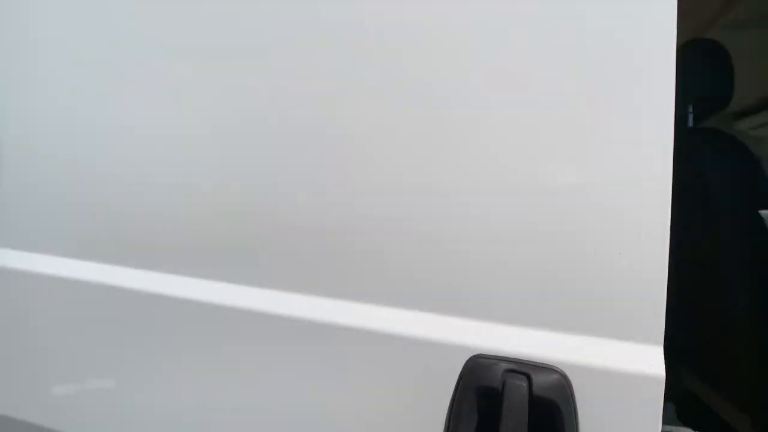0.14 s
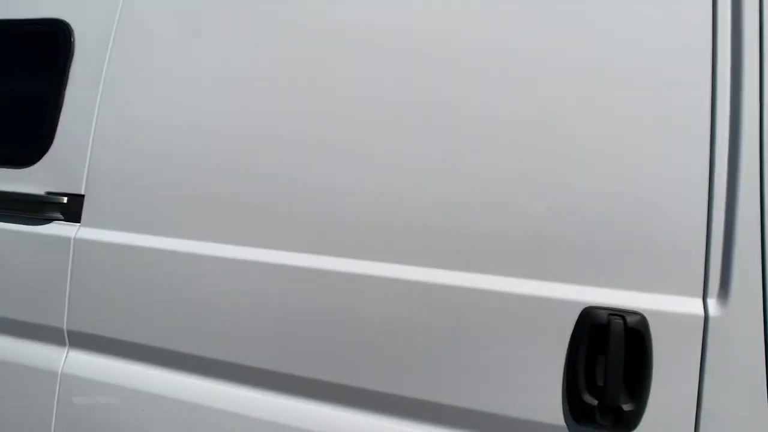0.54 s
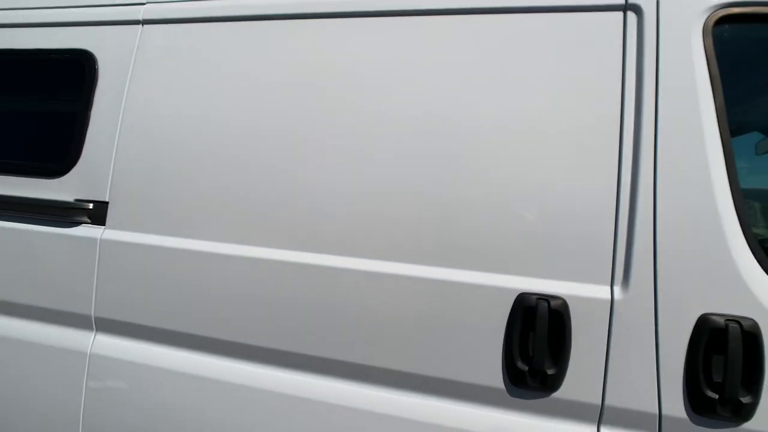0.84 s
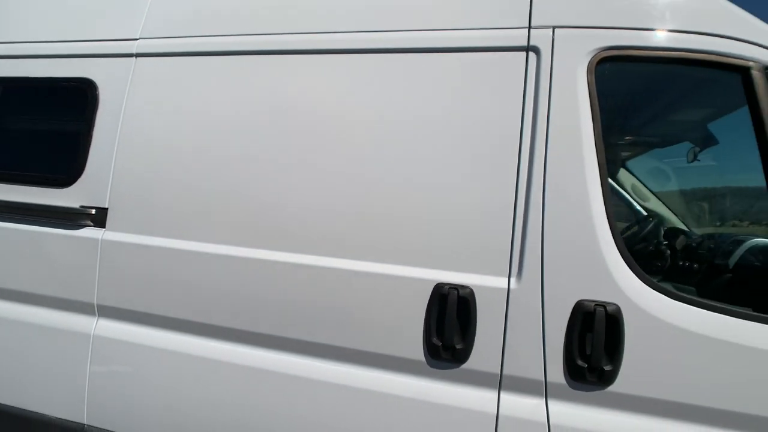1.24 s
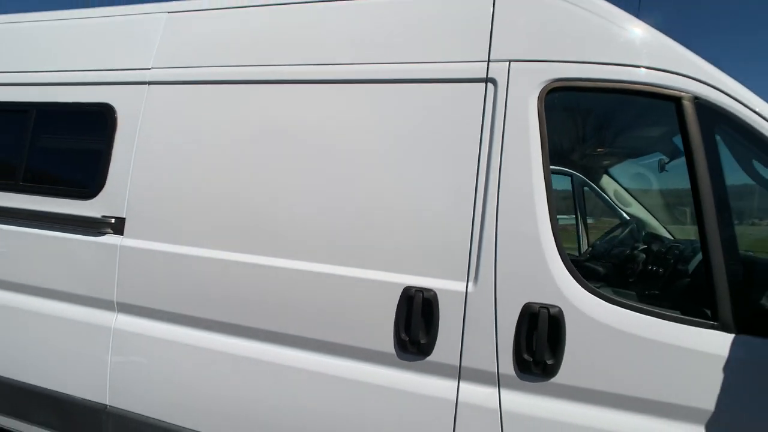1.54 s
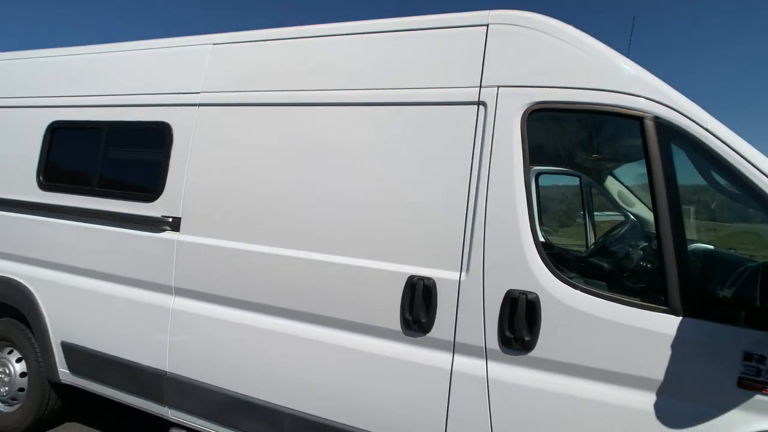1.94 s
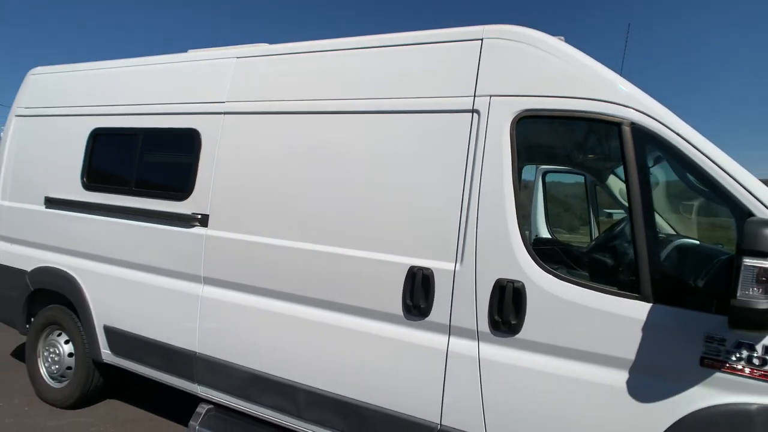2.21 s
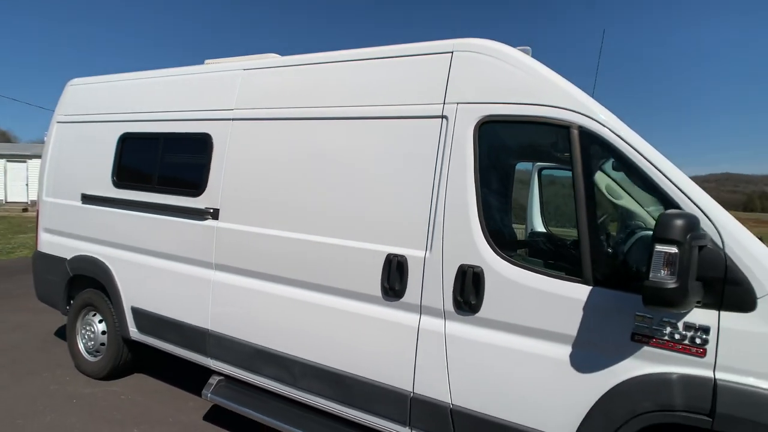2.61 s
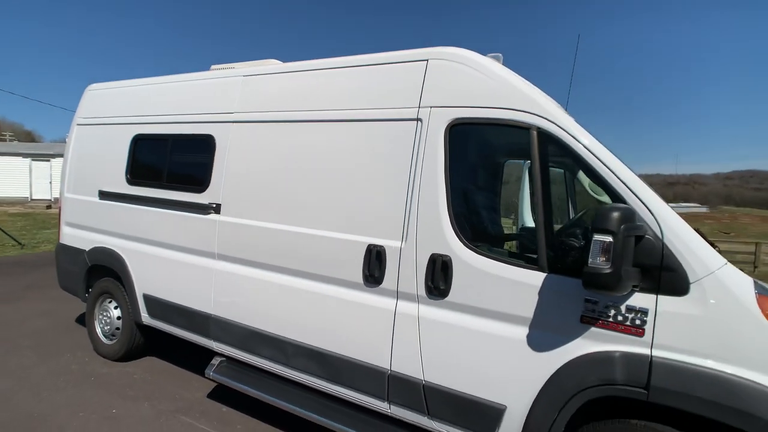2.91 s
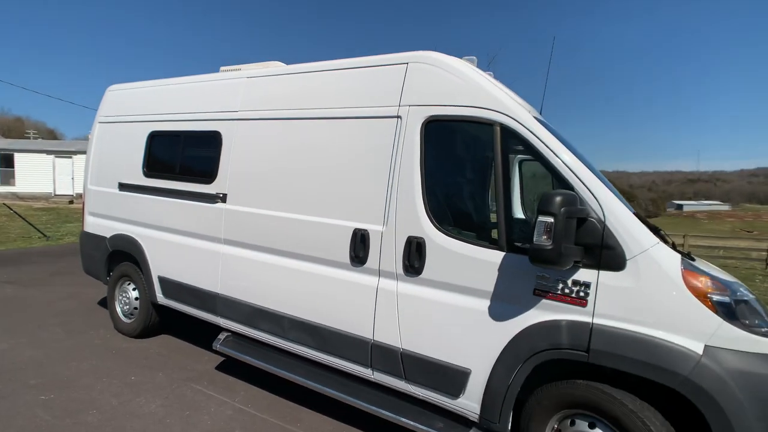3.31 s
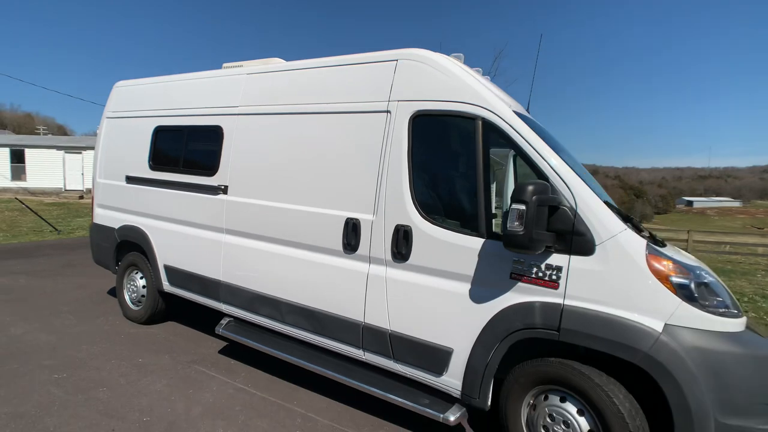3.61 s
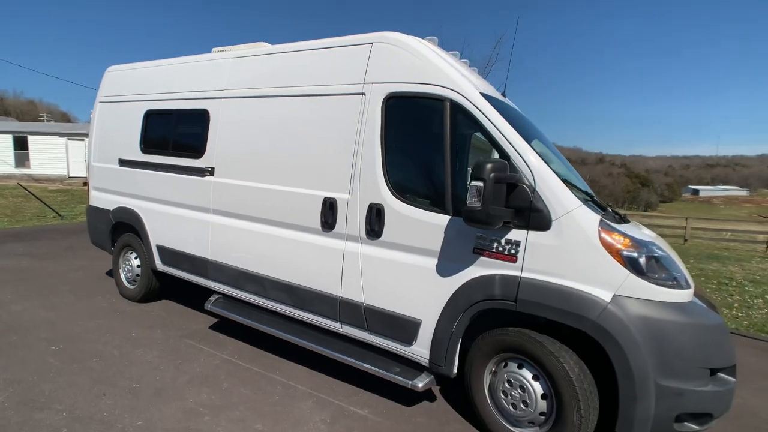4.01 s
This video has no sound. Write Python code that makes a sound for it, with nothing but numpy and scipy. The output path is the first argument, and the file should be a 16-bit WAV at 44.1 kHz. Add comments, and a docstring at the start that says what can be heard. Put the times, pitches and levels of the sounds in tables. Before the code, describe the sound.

A heavy van side door rolls briefly along its track and slams hard into its latch, then quiet outdoor hum with faint scuffs.

```python
"""A van's heavy side door rolls along its track, knocks into the closing curve and slams into its latch.
Rolling is noise driving the door's resonances; each blow is a noise burst with decaying panel modes.
Damped sines make the knocks and the bracket's ping, and one low swing makes the boom of the cabin air.
Then someone moves off over asphalt with faint scuffs and rustles, made of band-filtered noise,
in a low outdoor hum of shaped noise with slow gusts of wind on the microphone."""
import sys
import numpy as np
from scipy import signal
from scipy.fft import rfft, irfft
from scipy.io import wavfile
from scipy.ndimage import uniform_filter1d

SR = 44100
rng = np.random.default_rng(int(sys.argv[2]) if len(sys.argv) > 2 else 0)


def put_to_file(sound):
    """Save the sound as 16-bit audio at rate SR, in the file named by the first command-line argument."""
    columns = np.atleast_2d(sound).T  # one column per channel
    safe = np.clip(columns, -1, 1)
    whole_steps = np.round(safe * 32767)
    wavfile.write(sys.argv[1], SR, whole_steps.astype(np.int16))


N = 183059
TIME = np.arange(N) / SR

# spectrum of gritty and cloth friction: f/Hz, relative level/dB
FRICTION_COLOUR = [(400, -23), (1000, 16.5), (2000, 17), (4000, 10.5), (7000, 0), (10000, 1), (13000, -3),
                   (16000, -18)]


def amp(db):
    """Logarithmic level: converts decibels to an amplitude gain."""
    return 10 ** (np.asarray(db) / 20)


def evened(x):
    """Normalisation: scales a signal to rms 1."""
    return x / np.sqrt(np.mean(x ** 2) + 1e-20)


def steadied(x, size=400):
    """Running power normalisation: evens out a noise over a window of size samples."""
    power = uniform_filter1d(x ** 2, size)
    return x / np.sqrt(abs(power) + 1e-3)


def read(points, hz):
    """Interpolates a table of values on a logarithmic frequency axis."""
    f, value = np.transpose(points)
    return np.interp(np.log(hz + 1), np.log(f + 1), value)


def add(mix, s, sound):
    """Superposition: adds a sound to the mix from time s."""
    part = mix[max(round(s * SR), 0):][:len(sound)]
    part += sound[:len(part)]


def coloured(x, colour):
    """Linear filtering: weights the spectrum of x by a colour, at rms 1."""
    gain = amp(read(colour, np.fft.rfftfreq(len(x), 1 / SR)))
    return evened(irfft(rfft(x) * gain, len(x)))


def noise(colour, size=N):
    """Random noise: white noise shaped by a spectrum, at rms 1."""
    return coloured(rng.standard_normal(size), colour)


def drift(hz):
    """Slow random fluctuation: noise under a Gaussian low-pass of scale hz, at rms 1."""
    low_pass = np.exp(-(np.fft.rfftfreq(N, 1 / SR) / hz) ** 2)
    return evened(irfft(rfft(rng.standard_normal(N)) * low_pass, N))


def resonate(x, hz, width):
    """Forced vibration: a single resonance driven by x, at rms 1."""
    return evened(signal.lfilter(*signal.iirpeak(hz, hz / width, fs=SR), x))


def band(hz, width, size=N):
    """Cascaded resonance: two equal passes give noise steep sides, at rms 1."""
    once = resonate(rng.standard_normal(size), hz, width)
    return resonate(once, hz, width)


def sounding(modes, colour, size=N):
    """Modal superposition: noise drives a set of resonances, at rms 1."""
    return evened(sum(amp(db) * resonate(noise(colour, size=size), hz, width) for hz, width, db in modes))


def gliding(hz, width):
    """Quadrature modulation: a narrow noise band follows a frequency curve, at rms 1."""
    phase = 2 * np.pi * np.cumsum(hz) / SR
    return evened(drift(width) * np.cos(phase) + drift(width) * np.sin(phase))


def ring(modes):
    """Free vibration: exponentially decaying sines of a struck object."""
    t = TIME[:SR]
    return sum(amp(db - 60 * t / t60) * np.sin(2 * np.pi * hz * t) for hz, db, t60 in modes)


def knock(hz, db, t60, rise_cycles):
    """Damped oscillation: one decaying sine whose build-up is timed in its own cycles."""
    build_up = 1 - np.exp(-(TIME[:SR] * hz / rise_cycles) ** 2)
    return ring([(hz, db, t60)]) * build_up


def bump(middle, length):
    """Gaussian envelope: 1 at its middle, 1/e at half a length to either side."""
    return np.exp(-np.square(2 * (TIME - middle) / length))


def wheels(from_midway_s, level_db=-28, db_per_s=18, sing_db=-2, sing_waver=0.037, sing_swing_db=2):
    """Rolling contact: a noisy hiss in which the modes of the steel wheels sing with a wavering pitch."""
    # wheel hiss: f/Hz, relative level/dB
    wheel_colour = [(1500, -19), (3500, 6), (5500, 1), (8000, 0), (10500, -23), (15000, -40)]
    # wheel modes: f/Hz, width/Hz, relative level/dB
    wheel_modes = [(3240, 150, 4), (4340, 160, 1.5), (5850, 110, 1)]
    waver = 1 + sing_waver * drift(8.5)
    modes = evened(sum(amp(db) * gliding(hz * waver, width) for hz, width, db in wheel_modes))
    singing = amp(sing_db + sing_swing_db * drift(27)) * modes
    return amp(level_db + db_per_s * from_midway_s) * (noise(wheel_colour) + singing)


def rolling(judder_db=1.0, modes_db=-3.0, grind_db=-3.0, deep_hz=195, deep_width=35, deep_db=-10,
            deep_curve_db=7, grit_per_s=260, grit_db=-7, grit_spread_db=4):
    """Forced vibration: rollers grind over grit and drive the hollow door, deeper in the closing curve."""
    # rolling noise: f/Hz, relative level/dB
    roll_colour = [(60, -4), (140, -10), (190, -6.5), (260, -1.5), (400, 2.5), (600, -9), (750, -11.5),
                   (1050, -15.5), (2100, -21), (2700, -29.5), (5500, -43), (8000, -50), (10500, -54),
                   (15000, -71)]
    # modes of the hollow door: f/Hz, width/Hz, relative level midway/dB, change/(dB per s)
    door_modes = [(219, 71, -4.5, 9), (384.2, 9.4, -2, 8), (615, 23, -7, -22), (870, 25, -17.5, -31),
                  (1408, 32, -16.5, -26.5), (2100, 110, -19.5, 9)]
    # the door coasts and slows, presses into the closing curve, and stops in the latch
    start_db, coast_db_per_s = -36, -15.5
    curve_s, curve_db, curve_ease_s = 0.343, 5, 0.0096
    latch_s, stop_db_per_s = 0.454, -270
    # the rumble starts here, then sinks in pitch and level
    rumble_hz, rumble_width_hz, rumble_db, rumble_db_per_s, slowing_per_s = 572, 128, -4.5, -14, 1.7

    in_curve = .5 + .5 * np.tanh((TIME - curve_s) / curve_ease_s)
    moving_s = np.minimum(TIME, latch_s)
    from_midway_s = moving_s - latch_s / 2
    stopped_s = TIME - moving_s
    force = amp(start_db + coast_db_per_s * moving_s + curve_db * in_curve + stop_db_per_s * stopped_s)

    modes = np.zeros(N)
    for hz, width, db, slope in door_modes:
        mode = steadied(resonate(noise(roll_colour), hz, width), size=3000)
        modes += amp(db + slope * from_midway_s) * mode
    deep = amp(deep_db + deep_curve_db * in_curve) * resonate(noise(roll_colour), deep_hz, deep_width)
    grind = noise(roll_colour) * amp(judder_db * drift(60))

    # sparse random impulses of either sign and unequal strength
    impulses = (rng.random(N) < grit_per_s / SR) * rng.choice([-1, 1], N)
    strength = amp(grit_spread_db * np.minimum(rng.exponential(1, N), 2))
    grit = coloured(impulses * strength, roll_colour)

    speed = np.exp(-slowing_per_s * moving_s)  # relative to the start
    rumble = amp(rumble_db + rumble_db_per_s * moving_s) * gliding(rumble_hz * speed, rumble_width_hz)
    contact = amp(modes_db) * modes + amp(grind_db) * grind + amp(grit_db) * grit
    return force * (rumble + contact + deep + wheels(from_midway_s))


def shell_tail(x):
    """Frequency-dependent damping: the van's shell rings on with its own decay time in each band."""
    # decay of the shell: f/Hz, t60/s
    shell_t60 = [(100, 0.27), (400, 0.69), (1300, 0.23), (3000, 0.29), (8000, 0.23), (15000, 0.039)]
    hz, t, z = signal.stft(x, nperseg=256, fs=SR)
    decay = amp(-60 * t / read(shell_t60, hz)[:, None])
    return signal.istft(z * decay, nperseg=256)[1][:len(x)]


def blows(burst_db=2, skin_db=-3, body_tail_db=-17.0, clang_tail_db=-14, crack_tail_db=-18,
          rise_s=0.0011, crack_rise_s=0.00031):
    """Impact excitation: harder contacts are brighter and shorter; shell and panel modes then ring on."""
    # blows of rollers, seal, latch and door edge: t/s, then relative level/dB of body, clang,
    # crack and panel ring, then hardness as treble corner f/Hz
    contacts = [(0.348, -51, -56, -42, -70, 9000), (0.3505, -50, -45, -37, -67, 9200),
                (0.359, -28, -45, -43, -65, 7100), (.3735, -38, -37, -38, -59, 7040),
                (0.415, -34, -34.5, -41.5, -60, 7900), (.4215, -49, -38.5, -56, -66, 7000),
                (.471, -47, -40, -36, -65.5, 4320), (0.4794, -51, -29.5, -37.5, -50, 4300),
                (.487, -23, -37, -34.5, -60, 5970), (0.4962, -27, -21.5, -28, -37, 6200),
                (0.501, -29, -22.5, -22.5, -49.5, 11700), (0.505, -20, -28.5, -31, -64, 11000),
                (.526, -36, -34, -52, -52, 8000), (.533, -26.5, -31.5, -39.5, -51, 5830),
                (0.5392, -33, -40, -51, -40.5, 6500), (0.5456, -30, -29, -55, -60, 10000),
                (.554, -33, -34, -57, -49, 6540), (0.5602, -30, -33.5, -60, -59, 12800),
                (.573, -26, -32, -48.5, -61, 11100), (.582, -36, -46, -61, -50.5, 7000),
                (.619, -44, -59, -61, -66, 7000), (.630, -43, -47, -59, -74, 6000)]
    # spectra of the three parts of a blow: f/Hz, relative level/dB
    body_colour = [(60, -24), (130, -11), (200, 9), (255, 2), (320, -2.5), (520, -1.5), (700, -28),
                   (1100, -48), (3000, -49)]
    clang_colour = [(300, -29), (650, 4), (850, -5), (990, 2.5), (1170, -2), (1400, 2), (1650, -1),
                    (2000, -10), (2800, -10), (6000, -35)]
    crack_colour = [(900, -14), (2100, -2.5), (3200, -6.5), (4200, -7), (6500, -4), (8500, -7.5),
                    (11000, -6.5), (15500, -9)]
    # door skin under every blow: f/Hz, width/Hz, relative level/dB
    skin_modes = [(883, 46, -10), (1180, 84, -6.5), (1406, 180, -4.5), (1946, 130, -6.5)]
    # side panels: f/Hz, relative level/dB, t60/s
    panel_modes = [(74.7, 1, 0.5), (110.7, -12.5, 0.7), (146.6, -7, 1), (197, 3, 0.17), (210.4, -1.5, 0.43),
                   (277.4, -7, 0.3), (312.7, 6.5, 0.74), (339, 5, 0.19), (443, 3, 0.3), (484, -12, 0.61),
                   (494, 3, 0.33), (506, 3.5, 0.29), (570, -7, 0.56), (584, 0, 0.38), (827, 3, 0.17),
                   (1210, -5, 0.2), (1330, -11, 0.17), (880, 3, 0.17), (648, -6, 0.18), (1840, -21, 0.214),
                   (2280, -19, 0.16)]
    burst_t60_s, burst_at_hz, hard_shortens = 0.055, 6760, 0.93  # decay at a reference corner, exponent

    out, t, panel = np.zeros(N), TIME[:SR // 2], ring(panel_modes)
    for s, body_db, clang_db, crack_db, panel_db, corner_hz in contacts:
        t60 = burst_t60_s * (burst_at_hz / corner_hz) ** hard_shortens
        body = amp(body_db) * steadied(noise(body_colour, size=len(t)))
        skin = amp(skin_db) * sounding(skin_modes, clang_colour, size=len(t))
        clang = amp(clang_db) * steadied(noise(clang_colour, size=len(t)) + skin)
        # a rubber contact loses the top octave that bare steel keeps
        treble = [(hz, db - 20 * np.log10(1 + (hz / corner_hz) ** 4)) for hz, db in crack_colour]
        crack = amp(crack_db) * steadied(noise(treble, size=len(t))) * (1 - np.exp(-t / crack_rise_s))
        burst = (body + clang + crack) * amp(burst_db - 60 * t / t60)
        tail = shell_tail(amp(body_tail_db) * body + amp(clang_tail_db) * clang + amp(crack_tail_db) * crack)
        add(out, s, (burst + tail) * (1 - np.exp(-t / rise_s)))
        add(out, s, -amp(panel_db) * panel)  # the panels are pushed inwards
    return out


def bracket(rise_s=0.00015):
    """Beating: close high modes of the steel roller bracket interfere in a short ping."""
    # strikes as it enters the curve: t/s, relative level/dB
    strikes = [(.3515, -32.5), (.3589, -36)]
    # bracket modes: f/Hz, relative level/dB, t60/s
    bracket_modes = [(5340, -11, .05), (5655, -10, .045), (6268, -9, .06), (7191, 0, .06), (7350, -1, .055),
                     (8035, -12, .09)]
    out = np.zeros(N)
    for s, db in strikes:
        add(out, s, amp(db) * ring(bracket_modes) * (1 - np.exp(-TIME[:SR] / rise_s)))
    return out


def thumps(track_rise_cycles=0.74):
    """Damped oscillation: rollers bump along the track; then door skin, seal and latch plate knock."""
    # rough spots in the track, each with a short hollow ring: t/s, f/Hz, level/dB, t60/s
    rough_spots = [(.008, 412, -26, 0.1), (0.048, 400, -22.5, 0.063), (0.072, 235, -22, 0.069),
                   (.085, 611, -27, .06), (.104, 610, -25, 0.074), (0.119, 222, -21, .05),
                   (.145, 414, -23, .04), (.150, 263, -22.5, 0.057), (.278, 400, -23.5, 0.037),
                   (.290, 376, -24, .06)]
    # damped knocks of door skin, seal and latch plate, and the sway of the cabin air:
    # t/s, f/Hz, level/dB, t60/s, build-up/cycles
    knocks = [(.348, 240, -17.5, 0.051, 0.61), (0.365, 190, -23.5, 0.23, 0.87),
              (.359, 483, -24.5, 0.13, 0.49), (0.384, 9.6, -12, 1, 0.34), (0.3923, 390, -16, 0.058, 0.94),
              (.416, 390, -36, .12, 1), (0.428, 200, -31, .12, 0.86), (0.4709, 505, -11, 0.019, 0.27),
              (.4712, 810, -20.5, 0.023, 0.95), (0.4948, 292, -8, 0.024, 1.1),
              (0.496, 1194, -4, 0.015, 1.26), (0.5, 16.1, -6, 0.36, 0.49), (.509, 550, -27, 0.026, 1),
              (0.5201, 168, -3.5, 0.03, 0.57), (0.5263, 94, -25, 0.14, 0.19),
              (0.5366, 194, -13.5, 0.021, 0.14), (0.5383, 318, -18, 0.084, 0.88),
              (0.5366, 490, -16.5, 0.043, 1.7), (.554, 460, -25, 0.042, 0.36),
              (.575, 420, -23.5, 0.045, 0.77), (.584, 226, -20, 0.051, 0.31), (.619, 370, -28, 0.081, 0.24),
              (0.725, 920, -36.5, 0.052, 1.5), (.7405, 790, -35.5, 0.035, 1), (0.752, 890, -40, 0.054, 1.8)]
    out = np.zeros(N)
    for s, hz, db, t60 in rough_spots:
        add(out, s, knock(hz, db, t60, track_rise_cycles))
    for s, hz, db, t60, rise_cycles in knocks:
        add(out, s, knock(hz, db, t60, rise_cycles))
    return out


def boom(middle_s=.5085, length_s=0.038, hz=42.4, level_db=-12.5):
    """Air compression: the closing door squeezes the cabin air, which swings hard and vents at once."""
    return amp(level_db) * bump(middle_s, length_s) * np.sin(2 * np.pi * hz * (TIME - middle_s))


def ticks(sharpness=4.5, rise_s=0.00087):
    """Strong damping: thin, dry clicks of band noise with no ring of the shell."""
    # latch parts, later grit underfoot: t/s, f/Hz, relative level/dB, t60/s
    clicks = [(.4878, 8170, -40, 0.019), (.4935, 8650, -30, 0.017), (.7645, 6540, -55, 0.013),
              (1.078, 10500, -62, .04), (1.283, 7000, -64, 0.046), (1.38, 4600, -65, .05),
              (1.926, 5400, -60.5, 0.034), (3.178, 6000, -65, 0.054), (3.678, 3700, -62, 0.063)]
    out, t = np.zeros(N), TIME[:SR // 4]
    for s, hz, db, t60 in clicks:
        envelope = amp(db - 60 * t / t60) * (1 - np.exp(-t / rise_s))
        add(out, s, band(hz, hz / sharpness, size=len(t)) * envelope)
    return out


def scuffs(grain_db=3, sharpness=3, broad_db=-9):
    """Friction noise: short strokes of grit, each with its own broad resonance."""
    # shoe scuffs and sleeve rustles: middle t/s, time scale/s, level/dB, resonance f/Hz
    strokes = [(0.697, 0.067, -68.5, 6600), (0.729, 0.065, -53, 920), (0.744, 0.043, -66.5, 6340),
               (1.091, 0.043, -60.5, 2130), (1.085, 0.022, -65.5, 6900), (1.128, 0.3, -71.5, 2970),
               (1.185, 0.38, -73, 6740), (1.283, 0.018, -68, 4420), (1.385, 0.016, -69.5, 6300),
               (2.032, 0.023, -69, 6540), (2.372, 0.11, -67.5, 2540), (2.774, 0.022, -73, 6000),
               (2.76, 0.22, -76, 6500), (3.35, 0.08, -75, 7000), (3.828, 0.034, -71.5, 6400)]
    grit = coloured(rng.standard_normal(N) * amp(grain_db * drift(550)), FRICTION_COLOUR)
    out = np.zeros(N)
    for s, length, db, hz in strokes:
        stroke = np.exp(-(1.32 * (TIME - s) / length) ** 4)  # flat top, steep sides
        out += amp(db) * stroke * evened(resonate(grit, hz, hz / sharpness) + amp(broad_db) * grit)
    return out


def cloth(level_db=-85, swing_db=3.5, hz=6550, width_hz=1400):
    """Friction noise: a faint rustle of clothing under a slowly fluctuating level."""
    return amp(level_db + swing_db * drift(5.8)) * resonate(noise(FRICTION_COLOUR), hz, width_hz)


def wind(breeze_db=-32, fade_s=0.089):
    """Turbulent pressure: slow gusts over a light breeze on the microphone, and short low buffets, the first
    just after the slam."""
    # gusts, then buffets: middle t/s, length/s, level/dB
    gust_times = [(0.814, 0.85, -32), (1.423, 0.24, -26.5), (2.206, 0.41, -20.5), (2.856, 0.29, -27),
                  (3.48, 0.45, -29.5)]
    buffet_times = [(0.636, 0.18, -40), (2.25, 0.16, -53), (3.507, 0.087, -43), (3.687, 0.085, -48),
                    (3.906, 0.058, -48), (4.04, 0.069, -49)]
    # their spectra: f/Hz, relative level/dB
    wind_colour = [(1, -6.5), (5, 5.5), (10, 1), (15, -28.5), (22, -26.5), (35, -36), (60, -54),
                   (150, -76.5), (500, -120)]
    buffet_colour = [(15, 0), (32, 0), (80, -5), (150, -15), (400, -43), (1500, -79)]
    gusts = amp(breeze_db) + sum(amp(db) * bump(s, length) for s, length, db in gust_times)
    buffets = sum(amp(db) * bump(s, length) for s, length, db in buffet_times)
    slow_air = gusts * steadied(noise(wind_colour), size=12000)
    buffeting = buffets * steadied(noise(buffet_colour), size=4000)
    fade = np.tanh((TIME[-1] - TIME) / fade_s)  # a short fade-out of the wind noise at the end
    return fade * (slow_air + buffeting)


def outdoors(hum_db=-50.5, hum_swing_db=-2.0, waver_db=0.07, drone_width=13, drone_db_per_s=2.5):
    """Distant sources: a low hum, far traffic that passes once and swells, and a faint machine drone."""
    # hum and traffic rush: f/Hz, relative level/dB
    hum_colour = [(30, -2), (55, 1.5), (80, 6.5), (110, 0.5), (160, -2), (280, -6), (450, -16),
                  (650, -14.5), (1000, -52), (2000, -54)]
    rush_colour = [(250, -2), (600, -0.5), (900, 5.5), (1300, -0.5), (1800, -7), (2600, -14), (3600, -25.5),
                   (5000, -35.5), (7000, -41), (9000, -60), (15500, -49)]
    # swells of the far traffic: middle t/s, length/s, level/dB, centre f/Hz, width of each pass/Hz
    traffic_swells = [(1.745, 0.62, -51.5, 288, 298), (1.95, 0.58, -54, 1330, 730),
                      (2.203, 0.9, -52.5, 257, 295), (2.494, 1, -54, 650, 500), (3.922, 1, -48.5, 79, 70.4),
                      (3.45, 0.41, -53, 157, 69.6), (3.905, 1, -51, 235, 263)]
    # far machinery: f/Hz, level at mid-time/dB
    drone_tones = [(340, -62), (452, -59.5), (635, -73), (905, -62)]
    rush_s, rush_db, rush_pass_s = 3.36, -51, 1.73  # loudest moment, level there, time scale of the pass

    hum = amp(hum_db + hum_swing_db * drift(4.7)) * noise(hum_colour)
    distance = np.hypot(1, (TIME - rush_s) / rush_pass_s)  # relative to the nearest point
    rush = amp(rush_db) / distance * noise(rush_colour)
    swells = sum(amp(db) * bump(s, length) * band(hz, width) for s, length, db, hz, width in traffic_swells)
    drone = sum(amp(db) * resonate(noise(hum_colour), hz, drone_width) for hz, db in drone_tones)
    rising_drone = drone * amp(drone_db_per_s * (TIME - TIME.mean()))
    return (hum + rush + swells) * amp(waver_db * drift(25)) + rising_drone


def scene():
    """Superposition: the door and its slam, the steps, and the outdoor air in one channel."""
    door = rolling() + blows() + bracket() + thumps() + boom()
    person = scuffs() + cloth()
    return (door + ticks() + person + wind() + outdoors())[None]


def record(dry, hiss_db=-79.5, edge_hz=15800):
    """Transducer limits: the microphone adds a faint hiss, then a steep low-pass limits the band."""
    # microphone hiss: f/Hz, relative level/dB
    hiss_colour = [(2000, 6), (4500, 1.5), (7000, 2.5), (9000, 0.5), (12000, -1.5), (15500, -1)]
    hissing = dry + amp(hiss_db) * noise(hiss_colour)
    padded = np.pad(hissing, ((0, 0), (255, 255)), "edge")  # half a filter at each end
    low_pass = signal.firwin(511, edge_hz, window=("kaiser", 9), fs=SR)
    return signal.oaconvolve(padded, low_pass[None], "valid")


dry = scene()
out = record(dry)
put_to_file(out)
```